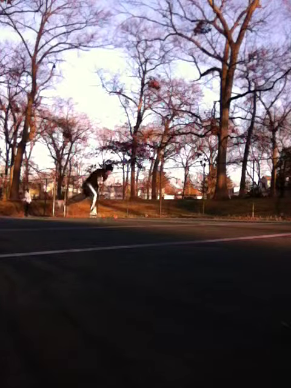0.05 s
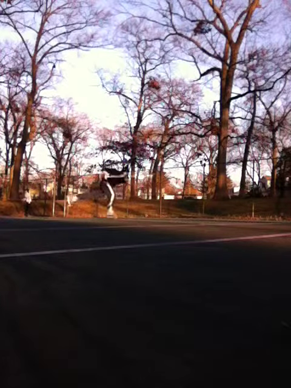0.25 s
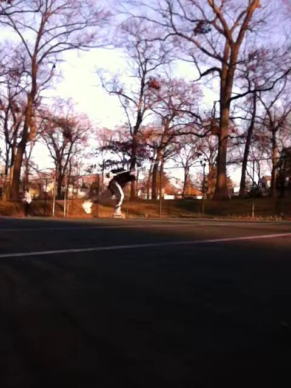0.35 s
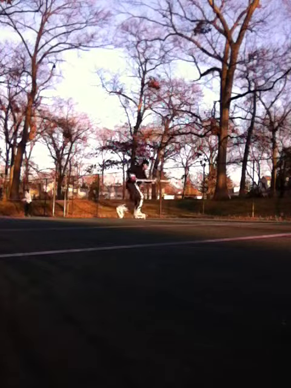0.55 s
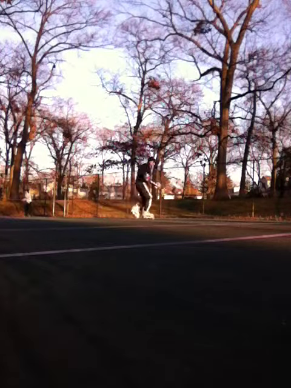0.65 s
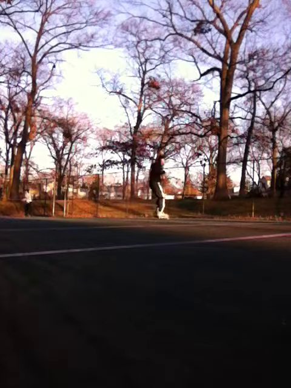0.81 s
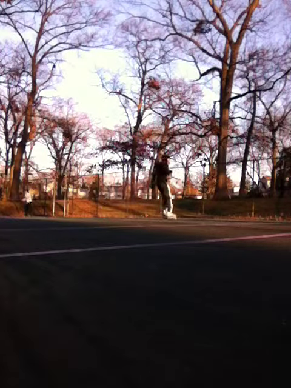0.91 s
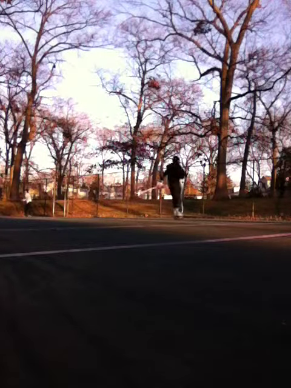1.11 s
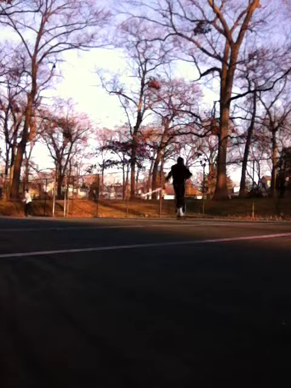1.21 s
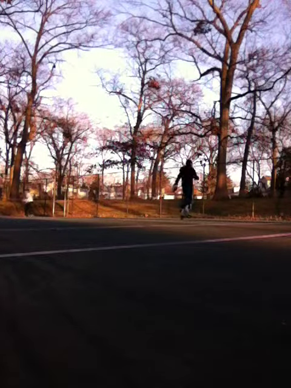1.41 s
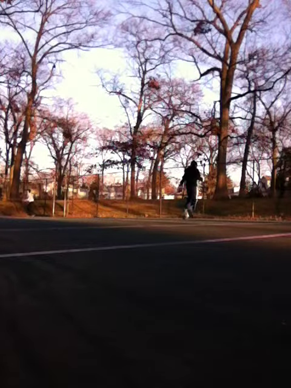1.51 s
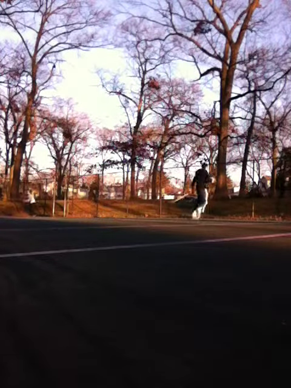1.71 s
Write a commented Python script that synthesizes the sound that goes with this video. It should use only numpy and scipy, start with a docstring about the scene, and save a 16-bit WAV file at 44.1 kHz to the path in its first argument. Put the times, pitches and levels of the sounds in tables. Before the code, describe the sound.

A sharp hockey slap shot on an outdoor court, then the ball hits a wire fence.

```python
"""A faint hum of distant traffic, then a skater's slap shot on an asphalt court among trees.
The blade slaps the ground, scrapes and knocks the ball away; stick, blade and ball resonate.
The park echoes the shot. The ball cracks into something that shivers brightly, probably a wire fence.
A skate lands with a dull double knock; grit ticks close by."""
import sys
import numpy as np
from scipy import signal
from scipy.fft import rfft, irfft, next_fast_len
from scipy.io import wavfile

SR = 44100
rng = np.random.default_rng(int(sys.argv[2]) if len(sys.argv) > 2 else 0)


def unload_wav(signal):
    """Save mono or channel-first audio to the path in sys.argv[1] as 16-bit WAV at rate SR, clipped to [-1, 1]."""
    wavfile.write(
        sys.argv[1],
        SR,
        np.round(np.clip(np.atleast_2d(signal).T, -1, 1) * 32767).astype(np.int16),
    )


N = 77175
TIME_S = np.arange(N) / SR

# hard blade contacts (time [s], level [dB], t60 [s], low-pass [Hz])
BLADE_CONTACTS = [(0.2409, 12.5, 0.01, 2300), (0.2442, 2.5, 0.0067, 9800), (0.256, -5.5, .014, 9020),
                  (.2660, -6.5, 0.019, 15000), (0.2684, 0, 0.013, 6000)]
# stick, blade and ball modes (frequency [Hz], width [Hz], gain [dB])
STICK_MODES = [(640, 54, -0.5), (830, 70, -2.5), (1120, 160, -4), (1460, 91, -2.5), (1620, 100, -6),
               (2046, 120, -1), (2270, 140, 5.5), (2640, 140, 6), (3075, 79, -3.5), (3310, 170, 2),
               (4360, 110, -8), (4644, 170, 1), (5140, 220, -3.5), (5750, 150, -9)]
BLADE_MODES = [(634, 74, 16), (1100, 300, 24), (1545, 230, 23.9), (2450, 660, 18.1)]
BALL_MODES = [(430, 58, 14.8), (742, 130, 20.5), (1050, 200, 20)]
# unpitched blade crack (frequency [Hz], gain [dB])
BLADE_CRACK_EQ = [(60, -35.5), (300, -12.5), (600, -18.5), (1400, -14), (1900, -12), (2600, -5),
                  (5000, -5.5), (7500, -9), (11000, -15), (16000, -18)]
# echoes off court and trees (time [s], level [dB], rise [s], t60 [s])
ECHO_WAVES = [(.266, -26, 0.0055, .15), (0.289, -36.5, 0.0081, 1), (0.343, -34, 0.018, 0.56)]
# echo spectrum (frequency [Hz], gain [dB])
ECHO_EQ = [(100, -12.5), (400, -13.5), (1000, 6.5), (1700, 0), (2500, 2.5), (4200, 0.5), (5500, -4.5),
           (7500, -14.5), (11000, -21.5), (16000, -29)]
# wire decay stages (level [dB], t60 [s], low-pass [Hz])
WIRE_STAGES = [(-35, 0.21, 14000), (-42.5, 0.71, 11000), (-46, 1.7, 5000)]
# fence crack and wire spectra (frequency [Hz], gain [dB])
FENCE_CRACK_EQ = [(100, -31), (1200, -33), (1800, -1.5), (2800, 4.5), (4000, -5), (7000, -19.5),
                  (11000, -15), (16000, 5)]
WIRE_EQ = [(100, -12), (600, -4.5), (1200, 5), (2500, 3), (4500, 2), (6800, 5), (9500, -0.5), (15000, 6.5)]
# low thuds (time [s], level [dB], t60 [s])
THUD_HITS = [(.277, -23.5, 0.14), (.541, -36, 0.12), (.577, -23, 0.063)]
# skate heel, then toe (time [s], level [dB])
SKATE_HITS = [(0.8766, -21), (0.881, -27)]
# grit ticks (time [s], level [dB])
GRIT_HITS = [(1.3332, -16.5), (1.3365, -27), (1.438, -40), (1.571, -38), (1.6970, -41)]
# thud, skate, grit and traffic spectra (frequency [Hz], gain [dB])
THUD_EQ = [(40, -16.5), (80, -4.5), (150, -6), (330, 3), (700, -4), (1500, -17), (5000, -58.5)]
SKATE_EQ = [(60, -17), (250, 6), (600, -5.5), (1300, -3), (2200, -18.5), (4000, -34.5), (12000, -33)]
GRIT_EQ = [(60, -19), (330, 17.5), (800, 6), (1500, -3.5), (2700, 4.5), (4200, -6), (6300, 1.5),
           (12000, -0.5), (16000, -6)]
TRAFFIC_EQ = [(25, -65.5), (60, -61), (100, -40.5), (150, -31), (280, -36.5), (500, -39), (900, -39.5),
              (1400, -47), (2200, -57.5), (3500, -64), (6500, -63.5), (10000, -68.5), (15500, -71)]
# engine drone envelope (time [s], gain [dB])
DRONE_ENVELOPE = [(0, -33), (.45, -33), (.6, -35), (1.0, -26.5), (1.75, -25.5)]


def slap_shot():
    """Contacts and scrape shake the stick; the blade claps on the ground; the ball knocks hollowly."""
    slap_s, knock_s, low_cut_hz = 0.2416, 0.267, 770
    force = sum(from_db(db) * lowpass(burst(s, t60_s), hz) for s, db, t60_s, hz in BLADE_CONTACTS)
    force += scrape_force()
    stick = modal_body(force, STICK_MODES)
    crack = equalise(force, BLADE_CRACK_EQ)
    slap = modal_body(impulse(slap_s), BLADE_MODES)
    knock = modal_body(impulse(knock_s), BALL_MODES)
    low_cut = signal.butter(2, low_cut_hz, "high", fs=SR, output="sos")
    return signal.sosfilt(low_cut, stick + crack + slap) + knock


def scrape_force():
    """Blade dragged over asphalt: dense impacts of log-normal size."""
    start_s, end_s, gain_db = 0.244, 0.269, -9
    pressure = (TIME_S >= start_s) * (TIME_S < end_s) + decay(end_s, t60_s=0.022)
    roughness = rng.choice([-1, 1], N) * np.exp(rng.standard_normal(N))
    return from_db(gain_db) * lowpass(pressure * roughness / roughness.std(), cutoff_hz=6500)


def park_echoes():
    """Court and trees scatter the shot: three swells of decaying noise."""
    wash = np.zeros(N)
    for start_s, db, rise_s, t60_s in ECHO_WAVES:
        attack = np.clip((TIME_S - start_s) / rise_s, 0, 1)
        wash += from_db(db) * rng.standard_normal(N) * attack * decay(start_s, t60_s)
    return equalise(wash, ECHO_EQ)


def fence():
    """The ball cracks against the fence; the wire shivers on, growing duller."""
    hit_s, crack_db = 0.54, -10
    crack = from_db(crack_db) * equalise(burst(hit_s, t60_s=0.0034), FENCE_CRACK_EQ)
    wire = sum(from_db(db) * lowpass(rng.standard_normal(N) * decay(hit_s, t60_s), hz)
               for db, t60_s, hz in WIRE_STAGES)
    return crack + equalise(wire, WIRE_EQ)


def thuds():
    """Soft low bumps after the shot and at the fence."""
    force = sum(from_db(db) * burst(s, t60_s) for s, db, t60_s in THUD_HITS)
    return equalise(force, THUD_EQ)


def skate():
    """Wheels land heel then toe: a dull double knock."""
    force = sum(from_db(db) * burst(s, t60_s=0.019) for s, db in SKATE_HITS)
    return equalise(force, SKATE_EQ)


def grit_ticks():
    """Nearby grit: dry clicks with brief crumbling tails."""
    tail_db, tail_t60_s = -22, 0.021
    force = sum(from_db(db) * (impulse(s) + from_db(tail_db) * burst(s, tail_t60_s))
                for s, db in GRIT_HITS)
    return equalise(force, GRIT_EQ)


def traffic():
    """Steady rush of far traffic and air; one engine's drone swells."""
    drone_hz, width_hz = 157.5, 55
    drone = resonance(rng.standard_normal(N), drone_hz, width_hz)
    drone = resonance(drone, drone_hz, 2 * width_hz)
    swell = from_db(np.interp(TIME_S, *np.transpose(DRONE_ENVELOPE)))
    rush = equalise(rng.standard_normal(N), TRAFFIC_EQ)
    return rush + drone * swell


def from_db(db):
    """Decibels to amplitude gain."""
    return 10 ** (np.asarray(db) / 20)


def equalise(x, curve):
    """Minimum-phase filter from (frequency [Hz], gain [dB]) points."""
    size = next_fast_len(2 * N, real=True)
    hz, db = np.transpose(curve)
    bins_hz = np.maximum(np.arange(size // 2 + 1) * SR / size, 1)
    gain = from_db(np.interp(np.log(bins_hz), np.log(hz), db))
    cepstrum = irfft(np.log(gain), size)
    cepstrum[1:size // 2] *= 2  # fold onto positive time: causal
    cepstrum[size // 2 + 1:] = 0
    response = np.exp(rfft(cepstrum))
    return irfft(rfft(x, size) * response, size)[:N]


def lowpass(x, cutoff_hz):
    """Second-order low-pass."""
    return signal.sosfilt(signal.butter(2, cutoff_hz, fs=SR, output="sos"), x + 1e-18)


def resonance(x, hz, width_hz):
    """Two-pole resonator, unity peak gain."""
    radius = np.exp(-np.pi * width_hz / SR)
    numerator = np.array([1, 0, -1]) * (1 - radius ** 2) / 2
    denominator = [1, -2 * radius * np.cos(2 * np.pi * hz / SR), radius ** 2]
    return signal.lfilter(numerator, denominator, x + 1e-18)


def modal_body(force, modes):
    """Parallel resonances, alternating in sign."""
    return sum((-1) ** k * from_db(db) * resonance(force, hz, width_hz)
               for k, (hz, width_hz, db) in enumerate(modes))


def decay(start_s, t60_s):
    """Step to 1, then exponential fall."""
    return (TIME_S >= start_s) * from_db(-60 * np.clip((TIME_S - start_s) / t60_s, 0, 5))


def burst(start_s, t60_s):
    """Decaying run of tiny random-sign impacts."""
    return rng.choice([-1, 1], N) * decay(start_s, t60_s)


def impulse(time_s):
    """One unit sample."""
    return 1.0 * (np.arange(N) == int(time_s * SR))


def scene():
    """Mono sum on both channels."""
    mono = slap_shot() + park_echoes() + fence() + thuds() + skate() + grit_ticks() + traffic()
    return np.array([mono, mono])


def record(dry):
    """Soft clip, then steep low-pass."""
    cutoff_hz = 16200
    clipped = 0.77 * np.tanh(dry / 0.82)
    return signal.sosfilt(signal.ellip(12, 0.1, 80, cutoff_hz, fs=SR, output="sos"), clipped)


dry = scene()
out = record(dry)
unload_wav(out)
```